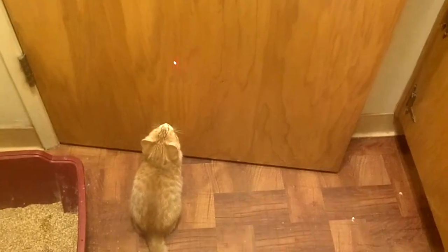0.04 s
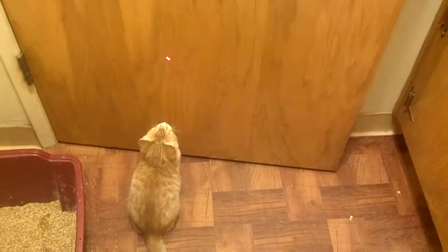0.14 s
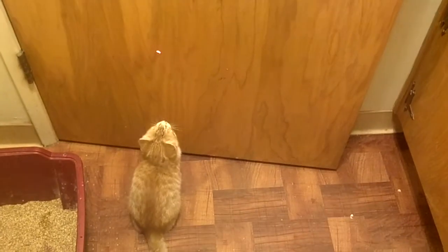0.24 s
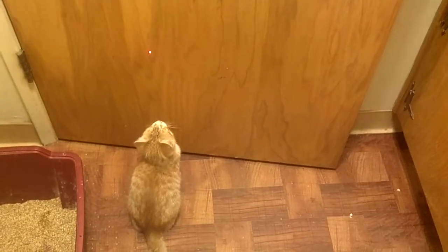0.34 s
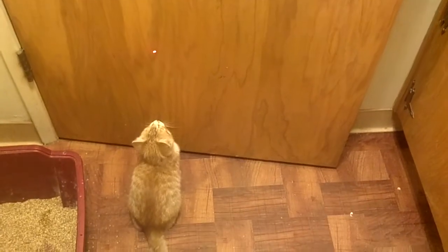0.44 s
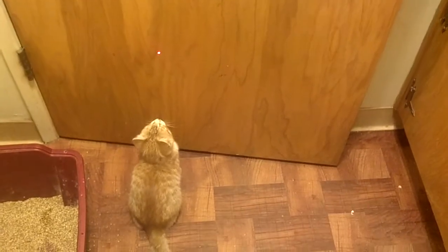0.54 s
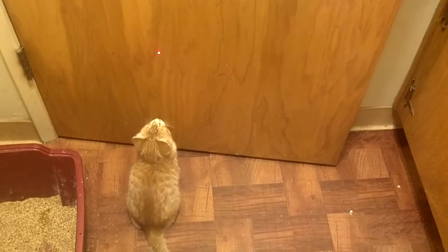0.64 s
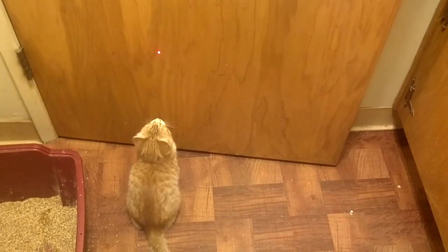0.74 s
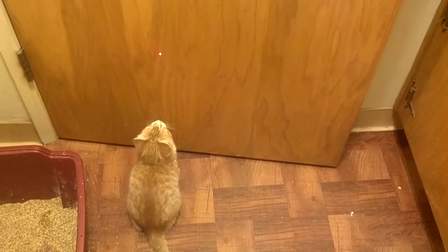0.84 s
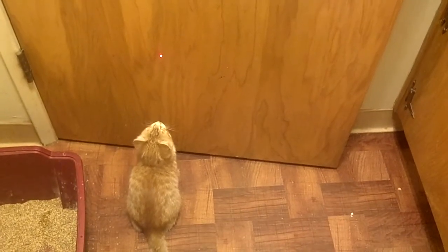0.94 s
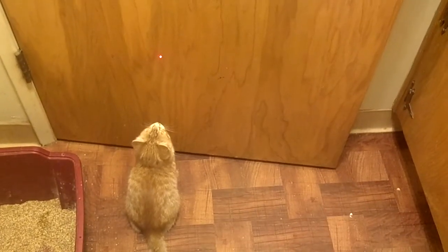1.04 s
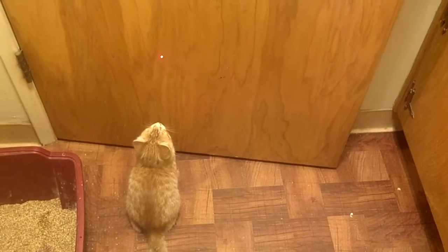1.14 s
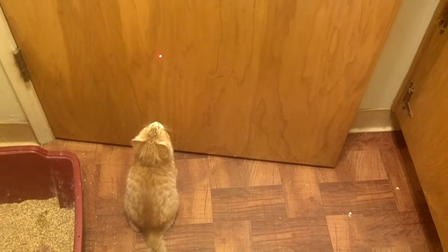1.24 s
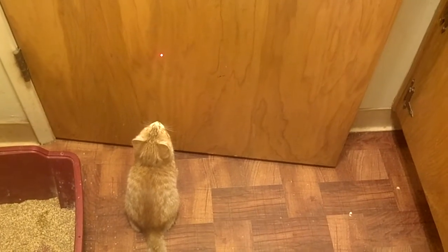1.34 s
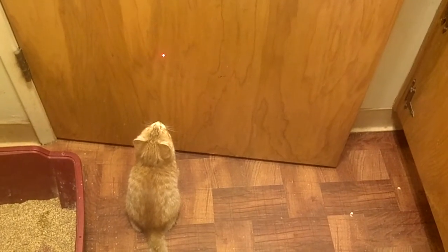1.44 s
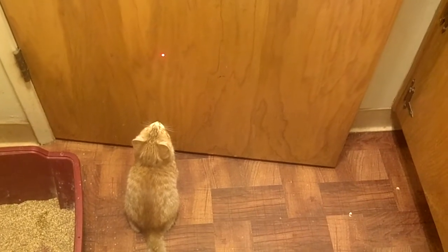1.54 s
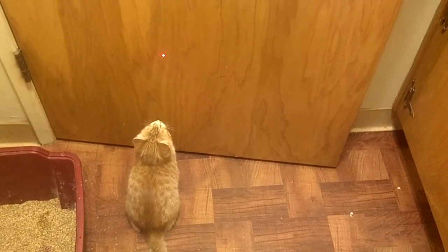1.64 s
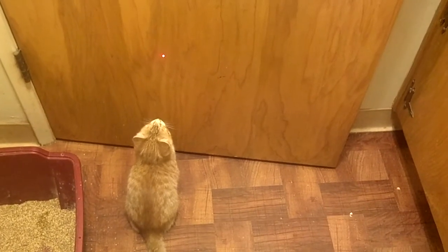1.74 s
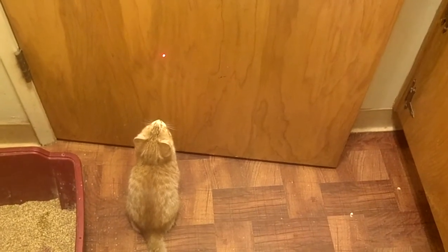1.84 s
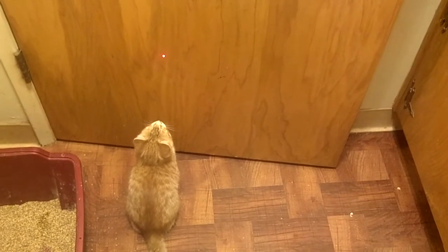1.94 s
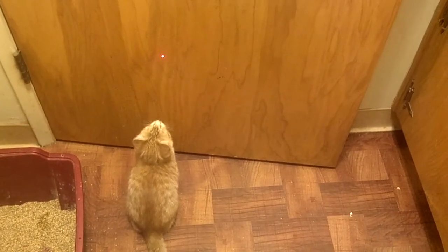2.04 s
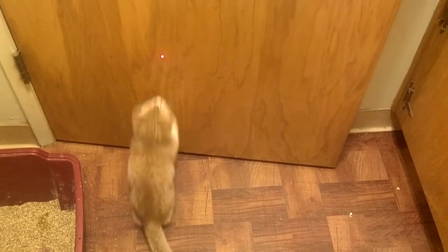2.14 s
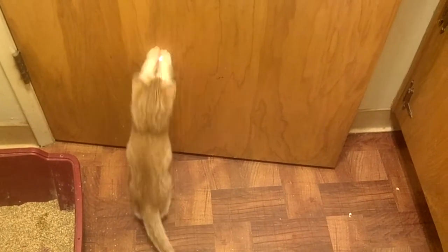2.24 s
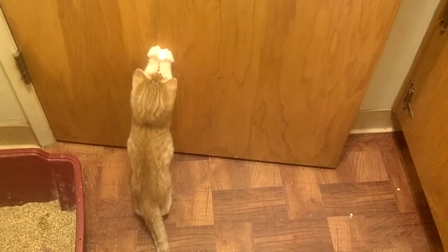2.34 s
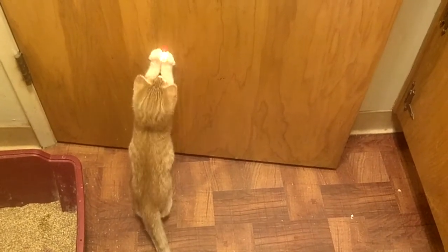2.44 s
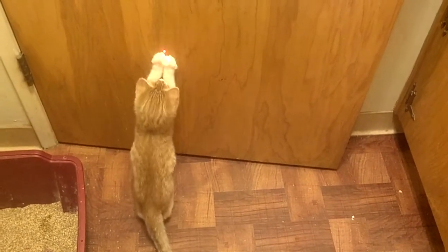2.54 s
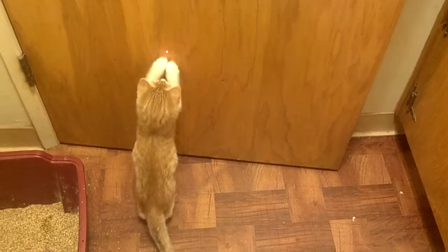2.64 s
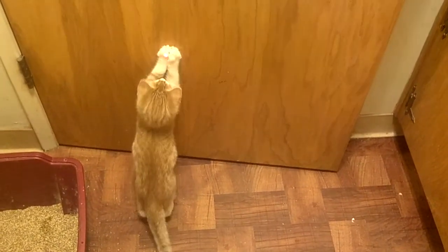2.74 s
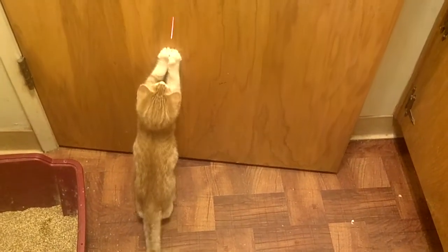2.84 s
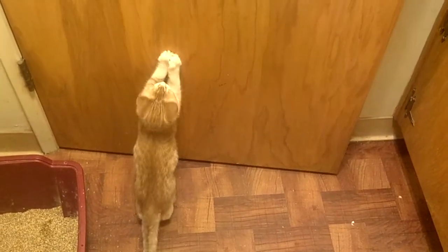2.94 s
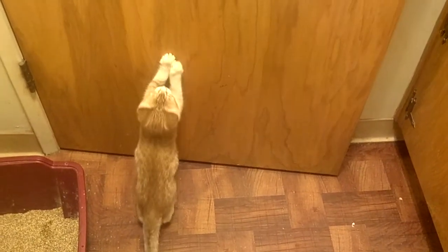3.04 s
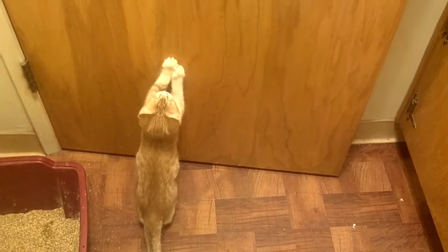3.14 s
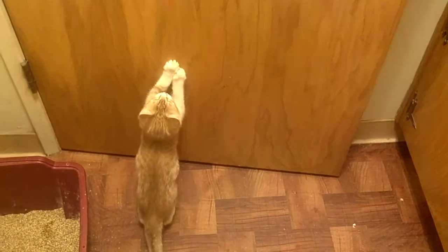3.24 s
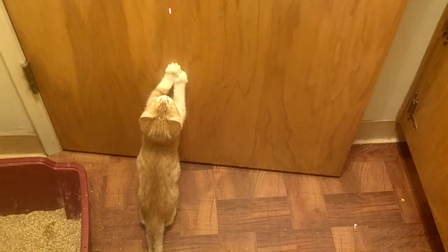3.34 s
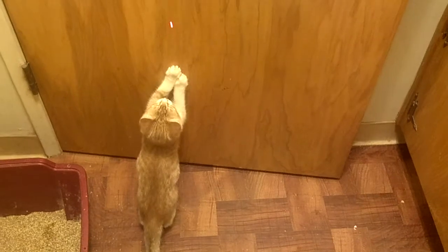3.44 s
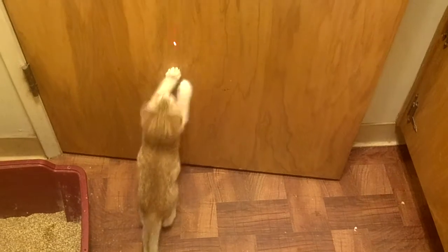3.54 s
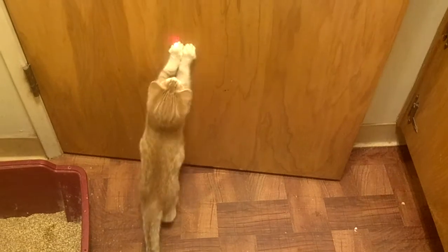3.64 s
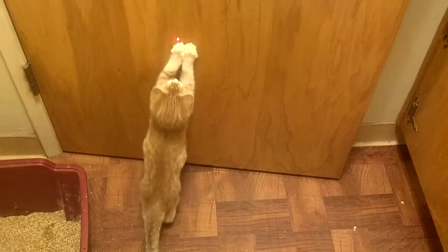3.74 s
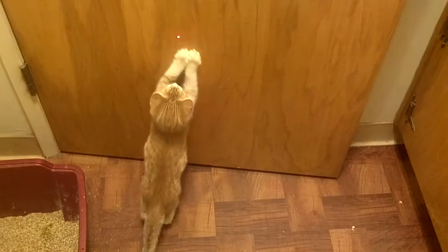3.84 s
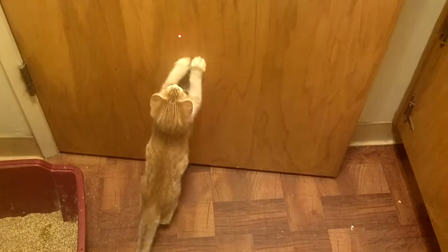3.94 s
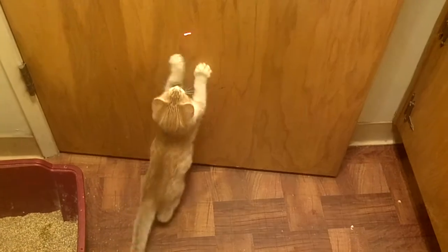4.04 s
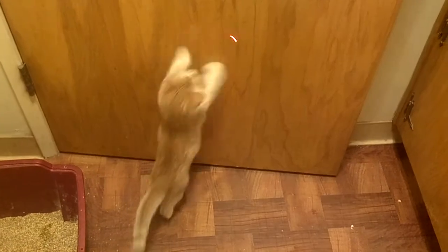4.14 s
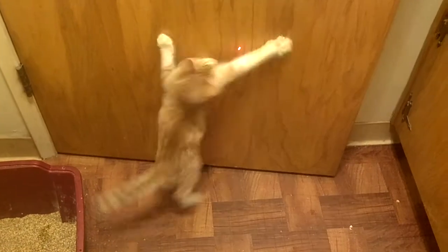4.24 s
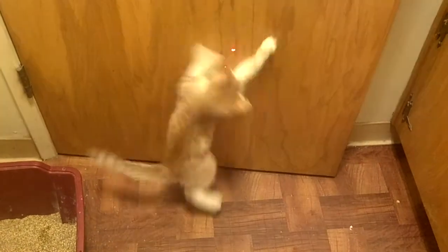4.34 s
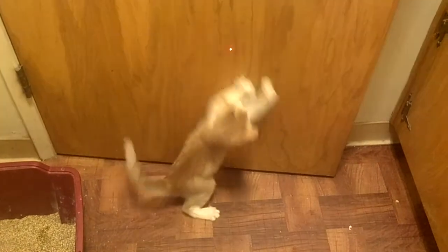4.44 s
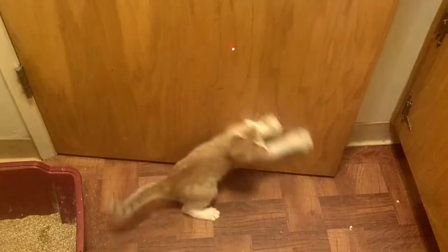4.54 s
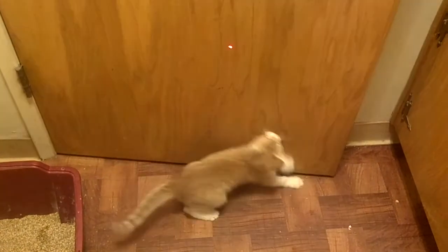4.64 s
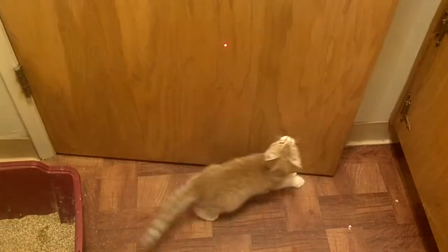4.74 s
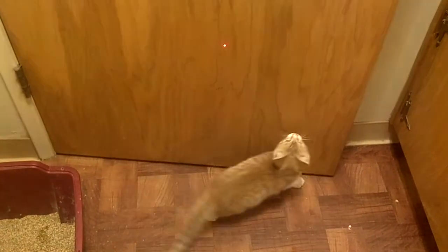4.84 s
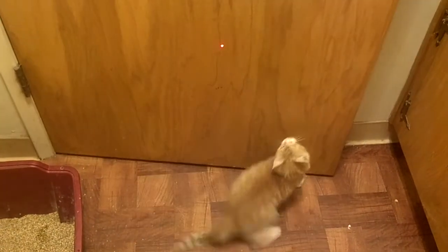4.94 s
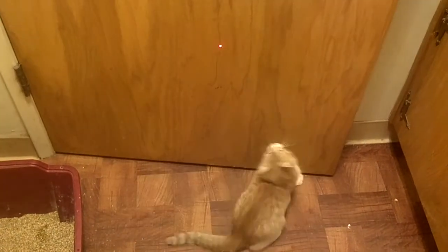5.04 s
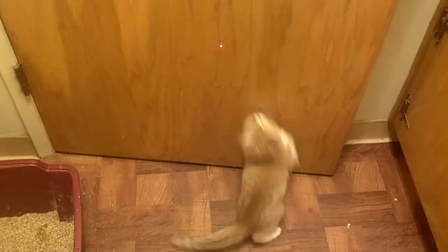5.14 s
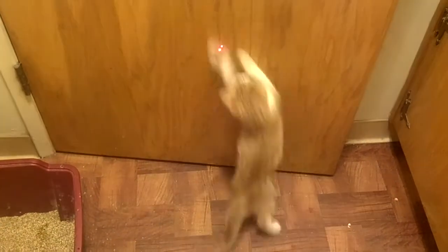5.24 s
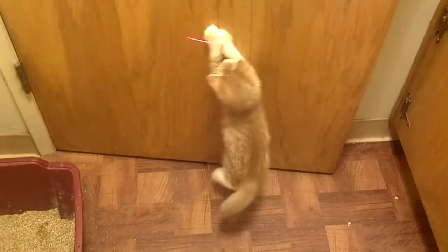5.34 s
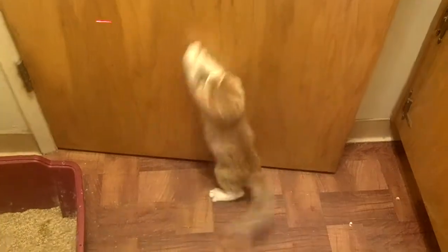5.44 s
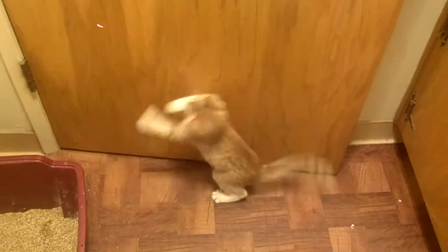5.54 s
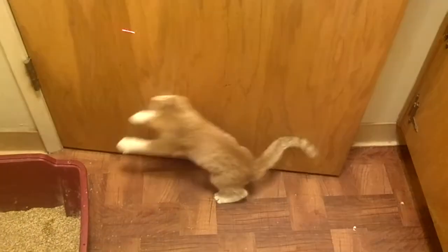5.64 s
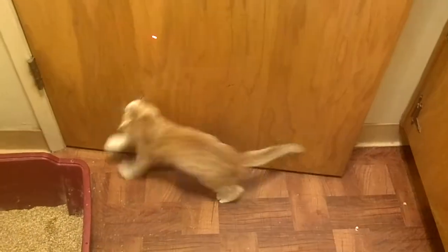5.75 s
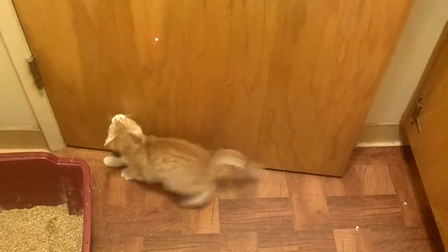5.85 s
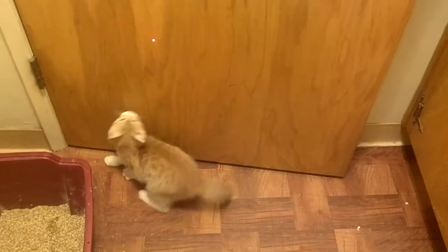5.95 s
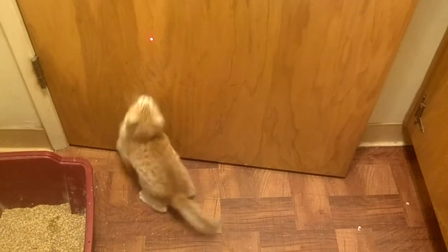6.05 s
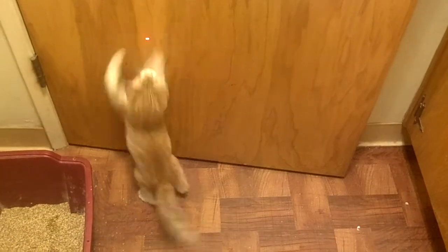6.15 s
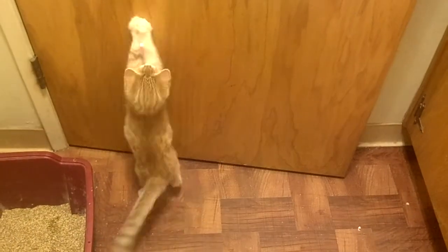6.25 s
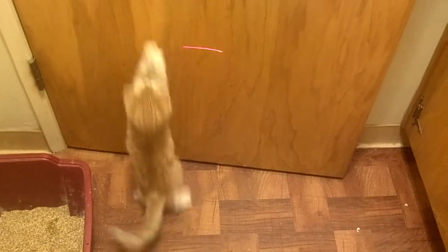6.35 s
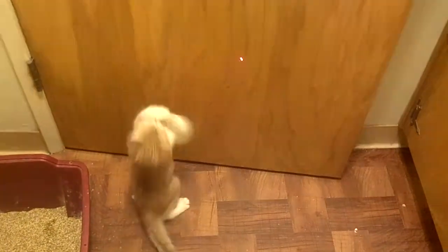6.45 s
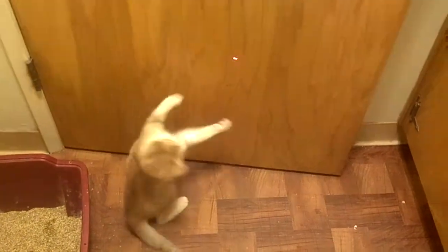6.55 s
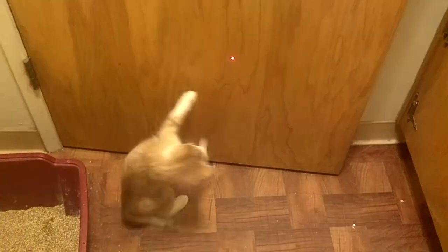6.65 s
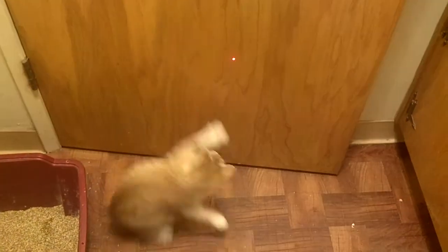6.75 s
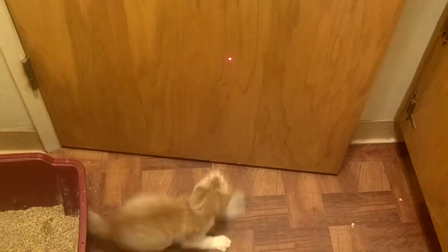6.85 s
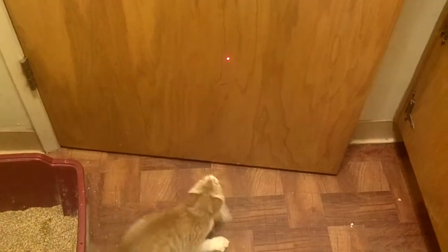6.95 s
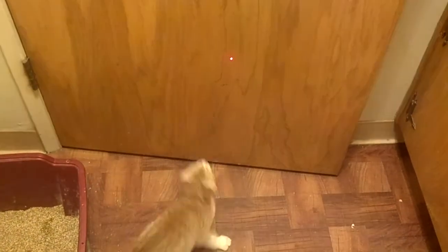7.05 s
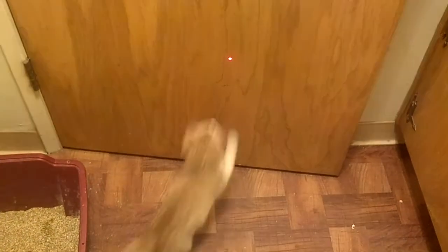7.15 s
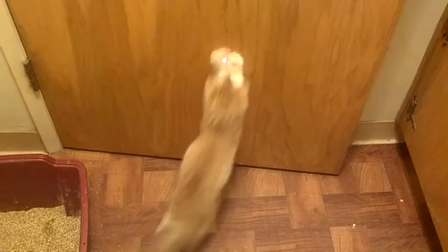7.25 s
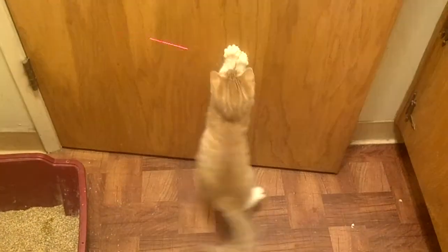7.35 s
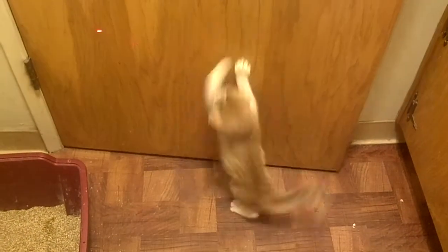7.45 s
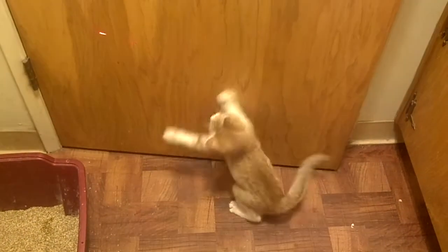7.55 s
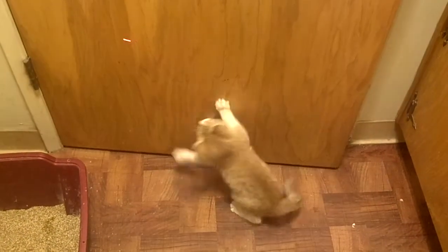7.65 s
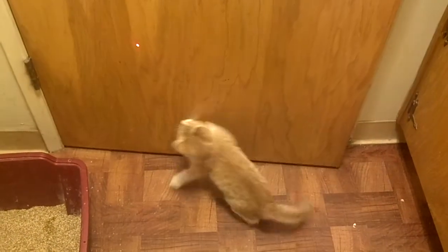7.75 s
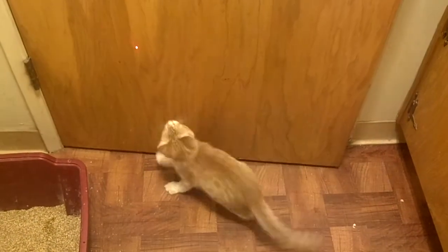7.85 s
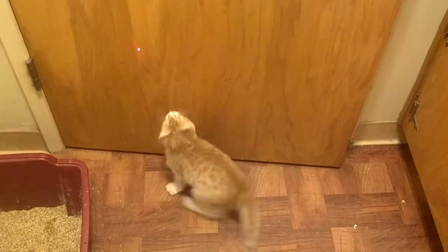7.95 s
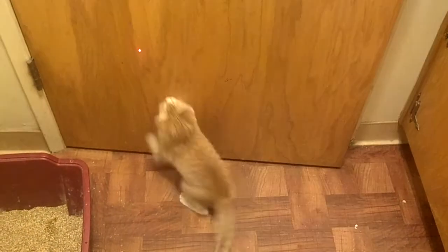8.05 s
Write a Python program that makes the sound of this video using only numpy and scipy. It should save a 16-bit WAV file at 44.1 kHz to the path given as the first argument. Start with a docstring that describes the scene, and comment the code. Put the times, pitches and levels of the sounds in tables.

```python
"""A kitten leaps at a hollow wooden door in a small hard room: claws click on the veneer, pads thump
the panel a moment later, and the paws slide down in short, snagging strokes. It also drops to the
vinyl floor and pushes off again. Soft rustles pass in the wait before the first leap; a fan hums faintly.
Contacts are shaped noise with dense echoes, door and floor ring as damped modes, and rubs are swelling noise.
Two closely spaced microphones hear it all."""
import sys
import numpy as np
from scipy import signal
from scipy.fft import rfft, irfft, next_fast_len
from scipy.io import wavfile
from scipy.ndimage import map_coordinates

SR = 44100
rng = np.random.default_rng(int(sys.argv[2]) if len(sys.argv) > 2 else 0)


def int16_out(signal):
    """Quantize to a 16-bit WAV file."""
    q = np.round(np.clip(np.atleast_2d(signal).T, -1, 1) * 32767)
    wavfile.write(sys.argv[1], SR, q.astype(np.int16))


N = 357651  # length in samples


def amp(db):
    """Decibels to gain."""
    return 10 ** (np.asarray(db) / 20)


def unit(x):
    """Scale to rms 1."""
    return x / np.sqrt(np.mean(x ** 2) + 1e-20)


def noise(count=SR):
    """Two independent rows of white noise: what the microphones share, and what tells them apart."""
    return rng.standard_normal((2, count))


def along(points, hz):
    """Read (Hz, value) points on a log frequency axis."""
    point_hz, values = np.transpose(points)
    return np.interp(np.log(hz + 1), np.log(point_hz + 1), values)


def wobble(rate, count=N):
    """A smooth random curve through `rate` random knots a second."""
    knots = rng.standard_normal(int(count * rate / SR) + 4)
    return map_coordinates(knots, [np.arange(count) * rate / SR])


def coloured(x, spectrum):
    """Filter noise by a spectrum in dB, then scale it to rms 1."""
    count = x.shape[-1]
    gain = amp(along(spectrum, np.fft.rfftfreq(count, 1 / SR)))
    return unit(irfft(rfft(x) * gain, count))


def tilted(spectrum, slope_db):
    """Tip a spectrum by so many dB per octave."""
    return [(hz, db + slope_db * np.log2(hz)) for hz, db in spectrum]


def add(track, s, sound):
    """Mix a sound into a track at s seconds."""
    part = track[:, round(s * SR):][:, :sound.shape[1]]
    part += sound[:, :part.shape[1]]


def standing_waves(x):
    """Walls and door reinforce some frequencies and cancel others, drawn anew for every contact."""
    ripple_db, spacing_hz = 2.7, 55
    count = x.shape[-1]
    place = np.fft.rfftfreq(count, 1 / SR) / spacing_hz
    ripple = map_coordinates(rng.standard_normal(size=2048), [place], mode="mirror")
    return unit(irfft(rfft(x) * amp(ripple_db * np.clip(ripple, -2, 2)), count))


def swell(attack, length, t60):
    """Envelope of a rub: it builds, holds, and dies away in the room (all in seconds)."""
    t = np.arange(SR) / SR
    build = np.minimum(t / min(attack, length), 1)
    return build * amp(-60 * np.maximum(t - length, 0) / t60)


def burst(spectrum, rise):
    """One contact swelling into the room's dense echoes, each band dying at its own speed."""
    # How fast the hard room dies. Each row: frequency in Hz, t60 in s.
    room_decay = [(150, 0.7), (500, 0.36), (1500, 0.5), (4000, 0.44), (8000, 0.38), (15000, 0.21)]
    contact = coloured(standing_waves(noise()), spectrum)
    hz, when, bands = signal.stft(contact, SR, nperseg=256)
    decay = amp(-60 * when / along(room_decay, hz)[:, None])
    echoes = signal.istft(bands * decay, SR, nperseg=256)[1][:, :SR]
    return echoes * (1 - np.exp(-np.arange(SR) / SR / rise))


def crack(spectrum, t60):
    """The short direct sound of a contact: shaped noise dying exponentially."""
    return coloured(noise(), spectrum) * amp(-60 * np.arange(SR) / SR / t60)


def ring(modes, rise, scatter_db, tilt_db=0, alternate=False, spot_hz=None):
    """Damped modes pushed together by a soft pad, their weights drawn anew for each blow."""
    # A paw drives hardest the modes that swing most where it lands: their lift and its width
    spot_db, spot_octaves = 9, 0.24
    t = np.arange(SR) / SR
    hz, db, t60 = np.transpose(modes)[:, :, None]
    if spot_hz:
        octaves_off = np.log2(hz / spot_hz)
        db = db + spot_db * np.exp(-(octaves_off / spot_octaves) ** 2)
    size = amp(db + tilt_db * np.log2(hz) + scatter_db * rng.standard_normal(hz.shape))
    # In the shared row, neighbouring modes may swing opposite ways, as they do far from the blow
    shared_phase = np.pi * alternate * np.arange(len(modes))[:, None]
    phase = np.array([shared_phase, rng.uniform(0, 2 * np.pi, hz.shape)])
    waves = size * amp(-60 * t / t60) * np.sin(2 * np.pi * hz * (t - rise) + phase)
    push = 1 - np.exp(-(t / rise) ** 2)
    return waves.sum(axis=1) / np.linalg.norm(size) * push


def fan(hum_db=-1.0):
    """Soft moving air is shaped noise; a few nearly steady tones swell and sink with it."""
    level_db, drift_db = -57.5, -0.74  # the air and the scale of its slow wander
    # Colour of the moving air. Each row: frequency in Hz, level in dB per Hz.
    air_colour = [(25, -38), (60, -12), (120, -9), (190, -5), (260, -0.5), (450, -2), (700, -8),
                  (1100, -13), (2400, -15.5), (4000, -19.5), (5500, -35), (8000, -24), (12000, -23.5)]
    # Tones of the fan. Each row: frequency in Hz, relative level in dB.
    tones = [(236, -3), (306, -3.5), (360, -4.5), (433, 2), (479, -14.5), (562, -10), (716, -14),
             (843, -14)]
    t = np.arange(N) / SR
    flow = amp(level_db + drift_db * wobble(1.473))
    air = coloured(noise(N), air_colour)
    hum = np.zeros(N)
    for hz, db in tones:
        hum += amp(db + 1.5 * wobble(4)) * np.sin(2 * np.pi * hz * t + .45 * wobble(5))
    shared_only = np.array([[1], [0]])
    return flow * (air + amp(hum_db) * unit(hum) * shared_only)


def drone():
    """The fan's low rumble, shaped noise that reaches the two microphones mostly out of step."""
    level_db, in_step = -60, 0.18  # in_step: gain of the part alike at both, against the opposed part
    # Colour of the rumble. Each row: frequency in Hz, level in dB per Hz.
    rumble_colour = [(30, -15), (70, -9), (88, -8), (98, -3), (105, 9), (114, -4), (170, -2.5), (230, -6),
                     (400, -24), (1000, -51)]
    shared, apart = coloured(noise(N), rumble_colour)
    return amp(level_db) * unit(np.array([in_step * shared + apart, in_step * shared - apart]))


def rustles(uneven_db=-2.0):
    """Soft, dull rustles as weight shifts: shaped noise that swells unevenly and dies in the room."""
    attack_s, t60_s = 0.026, 0.48
    # The rustles. Each row: start in s, length in s, level in dB, brightness in dB per octave.
    moments = [(0, 0.091, -55, 5.5), (0.157, 0.13, -54, 2), (1.137, 0.099, -48.5, 1),
               (1.238, 0.034, -56.5, 3.5), (1.515, 0.07, -57.5, 3), (1.907, 0.11, -60, -3)]
    # Their colour. Each row: frequency in Hz, level in dB per Hz.
    rustle_colour = [(100, -26), (240, -6), (420, 1), (700, 0), (1000, -10), (1400, -15), (2100, -12.5),
                     (3300, -24.5), (5000, -38.5), (10000, -47)]
    out = np.zeros((2, N))
    for s, length, db, brightness in moments:
        rub = coloured(standing_waves(noise()), tilted(rustle_colour, brightness))
        level = amp(db + uneven_db * wobble(68.0, count=SR))
        add(out, s, rub * swell(attack_s, length, t60_s) * level)
    return out


def snags():
    """Irregular ticks of uneven size as a sliding claw snags on the grain and ticks free."""
    catches_per_s, tick_t60_s = 600, .003
    slips = (rng.uniform(0, 1, SR) < catches_per_s / SR) * rng.exponential(1, SR)
    ticks = signal.lfilter([1], [1, -amp(-60 / SR / tick_t60_s)], slips)
    return ticks * noise()


def slides(flutter_db=0.5, snag_bright_db=3, snag_db=-9):
    """Claws hiss and snag on the wood grain; dragging pads make the door itself ring."""
    attack_s, t60_s = 0.033, 0.45  # the paw bears down; the sound dies in the room once it lifts
    # Paws and fur sliding over the wood. Each row: start in s, length in s, level in dB,
    # brightness in dB per octave, pad rub against the hiss in dB.
    strokes = [ (0.226, 0.11, -54, -4, -12), (2.508, 0.15, -53, 1, -3), (2.694, 0.049, -53, 2.5, -16),
               (2.957, 0.076, -55, -4.5, -0.5), (3.087, 0.024, -53, -4, -0.5),
               (3.148, 0.088, -52.5, -4, -6), (3.302, 0.23, -60, 0.5, 2), (3.627, 0.011, -59, 0, -18),
               (3.851, 0.099, -42, -1, -10), (3.944, 0.14, -41, -0.5, -7.5),
               (4.099, 0.079, -40.5, -1.5, -5), (4.219, 0.014, -42, -2.5, -5.5),
               (4.492, 0.071, -42.5, 5.5, -17), (4.523, 0.092, -38, 4.5, -22),
               (4.59, 0.076, -38.5, -1, -29), (6.271, 0.01, -42, 2, -3.5), (6.683, 0.28, -67, 0, -23),
               (6.991, 0.094, -55.5, 5, -25), (7.508, 0.075, -40.5, 1.5, -30),
               (7.608, 0.015, -31, 4.5, -50), (7.637, 0.018, -39.5, -1.5, -49), (7.98, 0.015, -61, 5, -23)]
    # Colour of claws on the grain. Each row: frequency in Hz, level in dB per Hz.
    scrape_colour = [(70, -17), (200, -3), (400, -5), (800, -23), (1350, -2), (1700, 1), (2100, 1.5),
                     (2500, 5), (2900, 7), (3800, 7), (5300, 4.5), (8000, 7), (11500, -5.5), (15500, -14.5)]
    # Pads exciting core and skin of the door. Each row: frequency in Hz, level in dB per Hz.
    rub_colour = [(80, -34), (250, -20), (325, -23), (358, 19.5), (395, -22), (600, 4), (830, 1), (980, 8),
                  (1120, 4.5), (1300, -5), (1800, -1.5), (3000, -45)]
    out = np.zeros((2, N))
    for s, length, db, brightness, pad_db in strokes:
        friction = noise() * amp(2.3 * wobble(1100, count=SR))
        hiss = coloured(standing_waves(friction), tilted(scrape_colour, brightness))
        ticks = coloured(snags(), tilted(scrape_colour, brightness + snag_bright_db))
        rub = coloured(noise(), rub_colour)
        level = amp(db + flutter_db * wobble(41.5, count=SR))
        pressure = swell(attack_s, length, t60_s) * level
        add(out, s, pressure * (hiss + amp(snag_db) * ticks + amp(pad_db) * rub))
    return out


def knock():
    """The direct crack of a paw on the wood and the dense echoes that follow it."""
    # Colour of the knock. Each row: frequency in Hz, level in dB per Hz.
    knock_colour = [(60, -53), (120, -7.5), (250, 0.5), (400, -12), (470, 2.5), (600, -5), (760, -3.5),
                    (1050, -8), (1300, -11.5), (1600, -13), (2300, -7), (4000, -18.5), (8000, -21)]
    return amp(-0.5) * crack(knock_colour, t60=0.03) + burst(knock_colour, rise=0.0043)


def claws(db, spread, snap_db, count=6, snap_t60=0.0043):
    """The claws of a paw land one after another on one spot, each with a bright snap and its echoes."""
    snap_bright_db = 2  # per octave: the direct snap is brighter than its echoes
    # Colour of a claw click. Each row: frequency in Hz, level in dB per Hz.
    click_colour = [(70, -23), (250, -27), (600, -12), (1500, -9.5), (2500, -1.5), (4000, -1), (5500, -1),
                    (6700, 0.5), (8300, 2.5), (10000, -4.5), (12000, -11.5), (15500, -18.5)]
    out, t = np.zeros((2, SR)), np.arange(SR) / SR
    snap = coloured(noise(), tilted(click_colour, snap_bright_db)) * amp(snap_db - 60 * t / snap_t60)
    click = amp(db) * (snap + burst(click_colour, rise=0.00033))
    landings = spread * np.arange(count) * rng.uniform(.8, 1.3, count) / count
    for delay in landings:
        add(out, delay, click / np.sqrt(count))
    return out


def door():
    """Claws click and the paw knocks the veneer; then the weight booms in the panel and hollow core."""
    # Pads on the door. Each row: contact in s, delay of the weight in s, panel boom in dB,
    # paw hardness in dB per octave on the boom, hollow core in dB, veneer ring in dB, knock in dB,
    # then the panel Hz and veneer Hz that the struck spot favours.
    blows = [ (2.347, 0.0055, -26, -13, -35.5, -45, -31, 145, 700),
             (2.797, 0.0062, -27.5, 1.5, -33, -30, -32, 199, 475),
             (3.160, 0.0037, -59, -2, -48, -54, -44, 200, 503),
             (3.249, 0.0018, -58, 6, -48, -54, -43, 200, 500),
             (3.705, .011, -26.5, -8, -26, -28.5, -34, 173, 470),
             (4.308, 0.0014, -30, 1, -38, -61, -42, 160, 750),
             (4.333, 0.0034, -42, 3, -30, -34, -35, 170, 1090),
             (4.547, 0.0023, -37, -5, -49, -66, -65, 150, 500),
             (5.311, 0.0025, -41, 1, -53, -63, -67, 170, 500),
             (5.353, 0.0035, -28, -1, -23.5, -40, -34, 159, 720),
             (5.364, 0.0028, -60, 0, -35, -29, -39.5, 171, 710),
             (6.179, 0.00059, -38.5, 9, -65, -67, -58, 170, 500),
             (6.289, 0.0048, -24, 9.5, -28.5, -35.5, -30, 176, 784),
             (7.330, 0.00884, -21.5, 0.5, -31, -26.5, -31, 275, 540)]
    # Claws on the door. Each row: start in s, level in dB, rough time over which they land in s,
    # direct snap over its echoes in dB.
    claw_hits = [(2.3478, -36, 0.016, 17.5), (2.7954, -30.5, 0.009, 17.5), (2.81, -36, .001, 17),
                 (2.815, -49, 0.029, 7), (2.9501, -51.5, .001, 11), (3.704, -39.5, 0.003, 16),
                 (3.7068, -31, .001, 13), (3.722, -45, .004, 18), (3.741, -51, .025, 1),
                 (4.309, -44.5, .008, -2), (4.331, -25.5, 0.0029, 11.5), (4.3585, -29, 0.022, 13),
                 (4.414, -52, .001, 13), (4.612, -42, .002, 17), (5.353, -28, .014, 12.5),
                 (5.373, -34, 0.024, 15), (6.2877, -30, .01, 17.5), (7.3318, -33, 0.016, 13),
                 (7.347, -30, 0.018, -5), (7.435, -39.5, .016, 15), (7.6225, -34.5, .002, 12.5)]
    # Modes of the panel, of the core's air and skins, and the upper modes of the veneer.
    # Each row: frequency in Hz, relative level in dB, t60 in s.
    panel_modes = [(91.5, -35.5, 1), (123.2, 1, 0.39), (148.1, -2, 0.42), (171.6, -1.5, 0.46),
                   (196, 6, 0.2), (219, -27, 0.34), (240, -3, 0.22), (275.6, -0.5, 0.24), (298, -21, 0.59),
                   (330, -1, 0.32)]
    core_modes = [(353, -6, 0.16), (362.3, 7, 0.34)]
    veneer_modes = [(442, -1, 0.22), (462, 0.5, 0.29), (498.5, 2, 0.12), (524, -6.5, 0.13),
                    (574, 2.5, 0.16), (675, 2.5, 0.32), (720, -2, 0.34), (748, 0, 0.35), (788, 3, 0.32),
                    (870, 2, 0.15), (910, -3, 0.29), (970, -9, .3), (1063, -6, 0.42), (1154, -9, 0.33),
                    (1550, -8, 0.5)]
    out = np.zeros((2, N))
    for s, lag, boom_db, hardness_db, core_db, veneer_db, knock_db, panel_hz, veneer_hz in blows:
        veneer = ring(veneer_modes, rise=0.003986, scatter_db=4.5, alternate=True, spot_hz=veneer_hz)
        add(out, s, amp(knock_db) * knock() + amp(veneer_db) * veneer)
        boom = ring(panel_modes, rise=0.00704, scatter_db=0.9, tilt_db=hardness_db, spot_hz=panel_hz)
        core = ring(core_modes, rise=0.00927, scatter_db=5.5)
        add(out, s + lag, amp(boom_db) * boom + amp(core_db) * core)
    for s, db, spread, snap_db in claw_hits:
        add(out, s, claws(db, spread, snap_db))
    return out


def steps(boards_db=3.0):
    """Pads slap the vinyl, claws tick, and floor modes thud, with a smack unless the slap is far weaker."""
    claw_spread_s, claw_snap_db = 0.0064, 12  # claws on vinyl
    smack_db, smack_t60_s = -6.5, 0.037  # the direct smack, relative to the thud
    slap_margin_db = 15  # a slap this far below its thud brings no smack
    # Paws on the floor. Each row: start in s, slap in dB, hollow thud in dB (boards_db lifts its modes),
    # claw tick in dB.
    footfalls = [(4.596, -29, -57, -41), (5.069, -83, -72, -59.5), (5.311, -70, -46.5, -58.5),
                 (5.707, -35.5, -47, -65), (5.909, -49.5, -46, -59.5), (6.192, -76, -37.5, -56),
                 (6.214, -63, -46, -72), (6.246, -60, -44, -72), (6.610, -78, -74, -62),
                 (6.876, -50.5, -69, -56.5), (6.963, -33.5, -17, -53), (6.9863, -58, -19, -58),
                 (6.996, -68, -55, -48.5), (7.064, -74, -37.5, -63), (7.209, -72.5, -51, -62),
                 (7.340, -51, -24.5, -69)]
    # Modes of the floor. Each row: frequency in Hz, relative level in dB, t60 in s.
    floor_modes = [(138, -19.5, 0.14), (172, -12.5, 0.21), (305.6, 5.5, 0.19), (357, 6, 0.2),
                   (395.6, -6.5, 0.27), (421, -10.5, 0.24), (467, -7, 0.12), (516, -10, 0.26),
                   (579, -1.5, 0.14)]
    # Colour of a pad's slap. Each row: frequency in Hz, level in dB per Hz.
    slap_colour = [(80, -23), (200, -2.5), (500, 7), (800, 5), (1300, -5.5), (1650, -7.5), (2000, -13),
                   (2800, -20), (6000, -52)]
    out = np.zeros((2, N))
    for s, slap_db, thud_db, tick_db in footfalls:
        slap = amp(slap_db) * burst(slap_colour, rise=0.00056)
        add(out, s, slap + claws(tick_db, claw_spread_s, claw_snap_db))
        thud = amp(boards_db) * ring(floor_modes, rise=0.0018, scatter_db=3.5, alternate=True)
        if slap_db > thud_db - slap_margin_db:
            thud = thud + amp(smack_db) * crack(slap_colour, smack_t60_s)
        add(out, s, amp(thud_db) * thud)
    return out


def microphones(x):
    """Mix the shared and the differing row into left and right, with a phase gap that varies with frequency."""
    # The spaced pair. Each row: frequency in Hz, lead of the right in radians, likeness from 0 to 1,
    # left minus right in dB.
    spaced_pair = [(62, 0, .6, 0), (120, 0.1, 0.45, 4), (175, -0.9, 0.7, 3.5), (265, -1.4, 0.6, -3),
                   (315, -0.7, .75, 0), (360, 0.3, .85, 1.5), (410, 0, .8, 3.5), (540, -0.3, 0.85, 0.5),
                   (780, -0.2, .8, 0), (1150, -0.1, 1, 0), (1550, .3, .85, 0), (1830, 1.9, 0.45, 0),
                   (2066, 2.9, 0.8, 0), (2250, 3.07, .996, 0), (2620, 3.2, .996, 0), (2900, 3.9, 0.55, 0.5),
                   (3150, 5, 0.65, -2), (3700, 6.3, .95, 0), (4250, 6.9, 0.5, -3), (5100, 9.6, .8, -3.5),
                   (5700, 10.3, 0.45, -7), (6400, 11.9, .85, 0), (7800, 16, 0.4, 7), (9630, 21, 0.37, 2),
                   (11350, 25.5, 0.25, -1), (15700, 29.5, 0, 1)]
    count = next_fast_len(N + SR // 2)
    hz = np.fft.rfftfreq(count, 1 / SR)
    knots, *columns = np.transpose(spaced_pair)
    lead, alike, tilt_db = [np.interp(hz, knots, column) for column in columns]
    turn = np.arccos(np.clip(alike, 0, 1)) / 2  # this mix of the two rows gives the wanted likeness
    shared, apart = rfft(x, count) * [np.cos(turn), np.sin(turn)]
    lean = amp(tilt_db / 2) * np.exp(-.5j * lead)  # half the gap to each side
    return irfft(np.array([(shared + apart) * lean, (shared - apart) / lean]), count)[:, :N]


def scene():
    """The kitten's play over the fan, as the pair of microphones hears it."""
    return microphones(fan() + rustles() + slides() + door() + steps()) + drone()


def record(dry, hiss_db=-65):
    """Each microphone adds its own hiss; the deep bass rolls off and nothing passes the band limit."""
    low_cut_hz, top_hz = 86, 15850
    # Colour of the microphones' self-noise. Each row: frequency in Hz, level in dB per Hz.
    hiss_colour = [(2700, -71), (5500, 0), (8000, -6.5), (11000, -4.5), (15500, 1.5)]
    heard = dry + amp(hiss_db) * coloured(noise(N), hiss_colour)
    low_cut = signal.butter(2, low_cut_hz, "highpass", fs=SR, output="sos")
    heard = signal.sosfilt(low_cut, heard)
    count = next_fast_len(N + SR // 2)
    in_band = np.fft.rfftfreq(count, 1 / SR) < top_hz
    return irfft(rfft(heard, count) * in_band, count)[:, :N]


dry = scene()
out = record(dry)
int16_out(out)
```